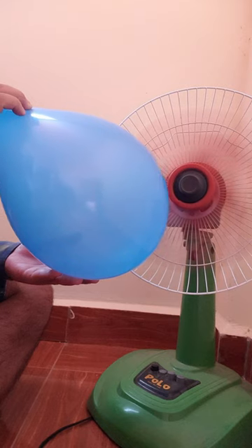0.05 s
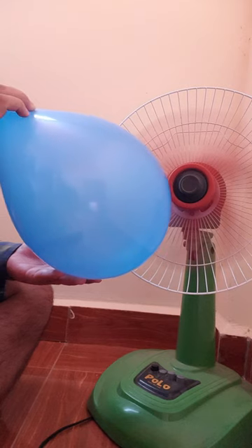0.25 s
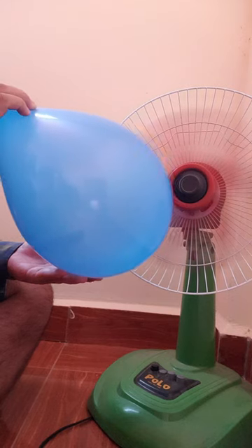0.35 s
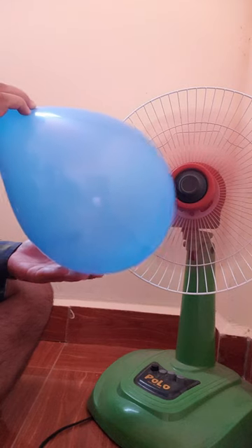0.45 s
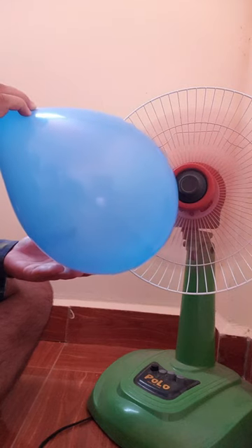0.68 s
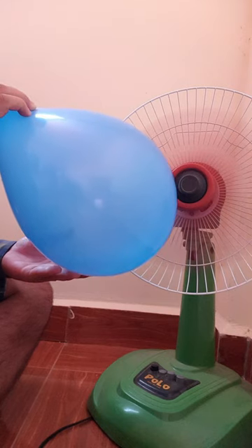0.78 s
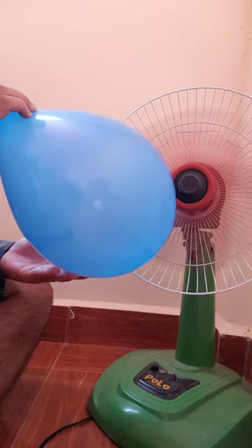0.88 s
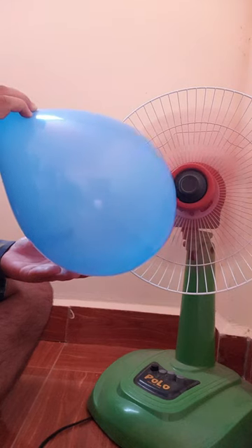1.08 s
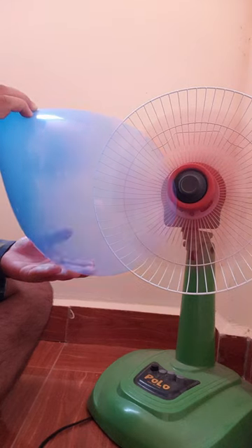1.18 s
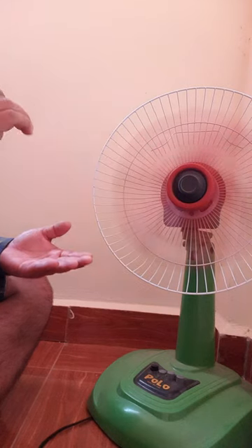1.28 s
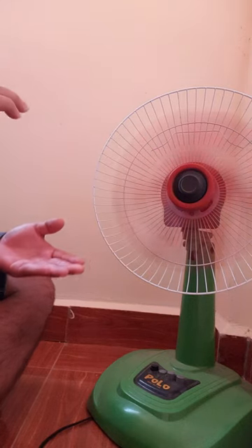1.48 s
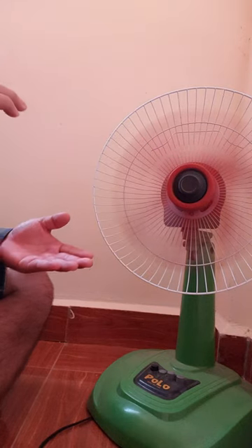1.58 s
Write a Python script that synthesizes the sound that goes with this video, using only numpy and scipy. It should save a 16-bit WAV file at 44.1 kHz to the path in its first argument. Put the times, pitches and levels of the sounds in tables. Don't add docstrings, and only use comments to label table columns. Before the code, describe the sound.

After a brief fan hum with light rattles, blades beat a balloon's skin in a rough, hissing flutter for about a second; it pops sharply, echoing in a hard small room, heard close up in stereo.

```python
import sys
import numpy as np
from scipy import signal
from scipy.fft import rfft, irfft
from scipy.io import wavfile
from scipy.ndimage import uniform_filter1d

SR = 44100
rng = np.random.default_rng(int(sys.argv[2]) if len(sys.argv) > 2 else 0)


def amp(db):
    return 10 ** (np.asarray(db, float) / 20)


def write(x):
    x = np.atleast_2d(x).T
    wavfile.write(sys.argv[1], SR, np.round(np.clip(x, -1, 1) * 32767).astype(np.int16))


N = 72765
T = np.arange(N) / SR

POP_S = 1.2616
LOOK_S = 0.006
STRETCH_S = (0.4, 0.82)

# t/s, strike level/dB
LONGEST_BLADE = [(0.2011, 6), (0.2563, -20), (0.3102, -22), (0.3688, -34), (0.4313, -25.5), (0.4993, -4),
                 (0.5767, -13), (0.6638, -39.5), (0.755, -24), (0.8364, -14), (0.916, -18), (0.9905, -34),
                 (1.0612, -19), (1.1341, -16), (1.2075, -8)]
BLADE_REACH = [0, -2.5, -5, -6, -8]
# t/s, drumming/dB, whole-skin swing over drumming/dB, scrape/dB,
# belly (two lowest skin modes) over its mean/dB
BALLOON_CONTACT = [(0.2, -33, -38, -36, -8), (0.21, -22.5, -23, -39.5, -11),
                   (0.245, -32.5, -26, -43.5, -1.5), (0.273, -18.5, -19, -33.5, 1),
                   (0.376, -18.5, -9, -25.5, 4), (0.408, -23, -42, -30, 9), (0.45, -17, 1, -26.5, -8.5),
                   (0.482, -37, 16, -29, -4), (0.502, -20.5, 3.5, -29, -15), (0.533, -24, -1.5, -25.5, 2.5),
                   (0.649, -28.5, 7.5, -28, 8), (0.681, -32.5, -12, -27.5, 16.5),
                   (0.722, -30.5, 6, -30, 8.5), (0.852, -31, -17, -34, 8.5), (0.938, -34, 0, -31.5, 3.5),
                   (1.096, -28, -4.5, -25.5, -1), (1.245, -28, 1.5, -24, -4), (1.256, -25.5, -27, -21.5, 6)]
# f/Hz, time to fall 60 dB/s
ROOM_DECAY = [(100, 0.93), (260, 0.42), (700, 0.42), (1840, 0.36), (4850, 0.37), (12800, 0.25)]


def evened(x):
    return x / np.sqrt(np.mean(x ** 2) + 1e-20)


def read(points, hz):
    f, value = np.transpose(points)
    return np.interp(np.log(hz + 1), np.log(f + 1), value)


def ramp(span):
    return np.clip((T - span[0]) / (span[1] - span[0]), 0, 1)


def resonate(x, hz, width):
    turn = np.exp(2j * np.pi * np.cumsum(hz * np.ones(N)) / SR)
    r = np.exp(-np.pi * abs(width) / SR)
    return 2 * (turn * signal.lfilter([1 - r], [1, -r], x / turn)).real


def twice(x, hz, width):
    return resonate(resonate(x, hz, width), hz, width)


def pair(colour, same):
    hz = np.fft.rfftfreq(N, 1 / SR)
    a, b = rfft(rng.standard_normal((2, N)))
    c = np.clip(read(same, hz), -1, 1)
    both = np.array([a, c * a + np.sqrt(1 - c ** 2) * b])
    return evened(irfft(both * amp(read(colour, hz)), N))


def steady(x, on):
    power = uniform_filter1d((x ** 2).mean(0), size=6001)
    touched = uniform_filter1d(on * 1., size=6001) + 1e-3
    return x / np.sqrt(power / touched + 1e-12)


def fan():
    # f/Hz, level/dB per Hz
    wash_colour = [(18, -40.5), (30, -15.5), (64, -11.5), (108, -9.5), (311, -18.5), (357, -12),
                   (465, -11.5), (490, -20), (2000, -39.5), (2600, -71), (4400, -120)]
    # f/Hz, level/dB per Hz
    air_colour = [(880, -19), (1500, -13.5), (1720, -16), (2740, -16), (3180, -19), (9750, -25.5),
                  (16000, -50)]
    # f/Hz, left-right likeness/-1 to 1
    air_likeness = [(60, 0.4), (250, 0.25), (700, 0.19), (1500, 0.05)]
    # t/s, level/dB, f/Hz
    rattles = [
        (.012, -36, 1000),
        (0.05, -50, 1110),
        (.062, -26, 600),
        (.135, -43, 1530),
        (0.148, -32, 1290),
        (0.181, -37, 1850),
    ]
    after = T > POP_S
    hum = evened(twice(rng.standard_normal(N), 65.3, 31))
    wash = amp(-37.5) * pair(wash_colour, air_likeness) + amp(-46.5) * hum
    lull = uniform_filter1d(np.where(after, amp(-21.5), 1.), size=301)
    air = amp(-55.5 - 5 * after) * pair(air_colour, air_likeness)
    tick = np.zeros(N)
    for start, db, hz in rattles:
        t = np.maximum(T - start, 0)
        tick = tick + amp(db) * t / 0.002 * np.exp(-t / 0.0016) * np.sin(2 * np.pi * hz * t)
    low_hum = after * amp(-43.5 - 28 * (T - POP_S)) * np.sin(2 * np.pi * 63.3 * T)
    return lull * wash + air + tick + low_hum


def room(x, t60_scale=1):
    taps = np.zeros((2, SR // 2))
    at = np.arange(100, SR // 2 - 20, 20) + rng.integers(0, 20, (2, (SR // 2 - 101) // 20))
    np.put_along_axis(taps, at, rng.choice([-1., 1.], at.shape), 1)
    hz, t, z = signal.stft(taps, SR, nperseg=256)
    t60 = t60_scale * read(ROOM_DECAY, hz)[:, None]
    tail = signal.istft(z * amp(-60 * t / t60), SR, nperseg=256)[1]
    return signal.fftconvolve(x, tail / np.linalg.norm(tail[0]), axes=1)[:, :N]


def blades():
    s = np.transpose(LONGEST_BLADE)[0]
    first = s[0]
    s = np.r_[2 * s[0] - s[1], s, 2 * s[-1] - s[-2], 3 * s[-1] - 2 * s[-2]]
    turns = np.interp(T, s, np.arange(len(s)))
    count = len(BLADE_REACH) * uniform_filter1d(turns, size=2001)
    return count, (T > first - .001) & (T < POP_S - LOOK_S)


def strikes(count, touching, spread_db, jitter, reach):
    luck = rng.standard_normal((200, 2))
    k = np.flatnonzero(np.diff(np.floor(count)) * touching[1:])
    n = np.floor(count[k + 1]).astype(int)
    blade = n % len(BLADE_REACH)
    at = k + (jitter * SR / 70 * abs(luck[n, 0])).astype(int) * (blade > 0)
    out = np.zeros(N)
    out[at] = amp(reach * np.array(BLADE_REACH)[blade] + spread_db * luck[n, 1])
    return out


def skin_swing(count, gate):
    s, drum_db, swing_db = np.transpose(BALLOON_CONTACT)[:3]
    skew = 0.11 + 0.34 * np.sin(2 * np.pi * 12 * T)
    phase = 2 * np.pi * count + 2.2 + skew * np.array([[-1], [1]])
    return np.sqrt(2) * np.cos(phase) * gate * amp(np.interp(T, s, drum_db + swing_db))


def skin_drum(count, on, gate):
    # f/Hz, width/Hz, level while slack/dB, level once taut/dB
    skin_modes = [(107.3, 23, -6.5, -4.5), (182, 26.4, -1.5, -41), (286, 41.5, -1.5, -4),
                  (336.9, 43, -1.5, -20), (500.6, 48, -14, -7), (630, 27, -15.5, -17),
                  (747, 25.4, -21.5, -14)]
    # f/Hz, width/Hz, level/dB
    long_rings = [(343, 18, 1), (750, 16, -24)]
    s, drum_db, _, _, belly_db = np.transpose(BALLOON_CONTACT)
    slap = evened(strikes(count, on, spread_db=2.6, jitter=.024, reach=0.25))
    slap = slap + .28 * rng.standard_normal((2, N)) * on
    slap = signal.sosfilt(signal.butter(2, 900, fs=SR, output="sos"), slap)
    taut = ramp((0.8874, 0.8883))
    belly = np.interp(T, s, belly_db)
    drum = np.zeros((2, N))
    for k, (f, width, slack_db, taut_db) in enumerate(skin_modes):
        db = slack_db + (taut_db - slack_db) * taut + (k < 2) * belly
        drum = drum + (-1) ** k * amp(db) * resonate(slap, f, width)
    swell = np.sqrt(2) * abs(np.sin(np.pi * (count / len(BLADE_REACH) - 0.023)))
    late_level = drum[:, taut == 1].std()
    for f, width, db in long_rings:
        ring = steady(resonate(slap, f, width), on) * gate
        drum = drum + taut * swell * late_level * amp(db) * ring
    return steady(drum, on) * amp(np.interp(T, s, drum_db))


def scrape_bursts(count, on):
    s, scrape_db = np.transpose(BALLOON_CONTACT)[[0, 3]]
    clicks = strikes(count, on, spread_db=1.3, jitter=0.0302, reach=0.75)
    at, db = np.transpose(LONGEST_BLADE)
    over_db = db - np.interp(at, s, scrape_db)
    accent = np.ones(N)
    for start, d in zip(at, over_db - over_db.mean()):
        accent = accent + (amp(.3 * d) - 1) * (abs(T - start) < .005)
    u = T[:3000] / 0.0061
    bursts = signal.oaconvolve(clicks * accent, np.minimum(u / .6, 1) * np.exp(-u))[:N]
    return bursts * amp(3 * evened(uniform_filter1d(rng.standard_normal(N), size=40)))


def guard_rings(grit, count):
    # f/Hz, width/Hz, level/dB
    guard_modes = [(2830, 150, -1), (3200, 190, 3), (4060, 200, 0), (4800, 420, 0), (7000, 800, -2),
                   (10300, 1200, -3), (12600, 1200, -2)]
    luck = rng.standard_normal((200, 2 * len(guard_modes)))[count.astype(int)].T
    rings = np.zeros((2, N))
    for k, (f, width, db) in enumerate(guard_modes):
        rings = rings + twice(grit * amp(db + 3.5 * luck[k]), f * (1 + .022 * luck[-1 - k]), width)
    return evened(rings)


def skin_scrape(count, on, gate):
    # f/Hz, level/dB per Hz
    light_colour = [(290, -33), (500, 1), (678, -7.5), (1950, -12), (2360, -9), (3650, -17), (9360, -23.5),
                    (15100, -22.5), (16000, -54.5)]
    # f/Hz, level/dB per Hz
    stretched_colour = [(290, -28), (500, -8.5), (750, -7.5), (819, -10), (2130, -9), (3150, -6),
                        (3590, -12.5), (7210, -5.5), (16000, -10.5)]
    # f/Hz, left-right likeness/-1 to 1
    hiss_likeness = [(60, 0.31), (180, 0.23), (550, 0.75), (1650, 0.12), (4970, 0.25), (15000, 0.18)]
    # f/Hz, width/Hz, depth/0-1
    guard_gaps = [(2600, 160, .5), (3620, 160, .45), (4360, 150, .5)]
    s, scrape_db = np.transpose(BALLOON_CONTACT)[[0, 3]]
    bursts = scrape_bursts(count, on)
    share = ramp(STRETCH_S)
    hiss = np.sqrt(1 - share) * amp(-3.5) * pair(light_colour, hiss_likeness)
    hiss = hiss + np.sqrt(share) * pair(stretched_colour, hiss_likeness)
    hiss = hiss * (bursts + amp(-18 + 7 * (1 - share)) * gate)
    grit = rng.standard_normal((2, N)) * bursts
    for k, (f, width, depth) in enumerate(guard_gaps):
        drift = 1 + .8 * np.sin(2 * np.pi * 2.3 * T + 2 * k)
        hiss = hiss - depth * share * drift * resonate(hiss, f, width)
    hiss = hiss + amp(-1) * share * guard_rings(grit, count) * hiss.std()
    slack_ring = evened(resonate(grit, 2354, 87))
    hiss = hiss + amp(-15.5) * (1 - share) * slack_ring * hiss.std()
    return hiss * amp(np.interp(T, s, scrape_db) + 8.0)


def pop():
    # f/Hz, level/dB per Hz
    pop_colour = [(35, -44), (60, -8.5), (319, -23), (385, -6), (589, -4), (988, -13), (12600, -16.5),
                  (15500, -17), (16700, -46)]
    # f/Hz, left-right likeness/-1 to 1
    pop_likeness = [(60, 1), (240, 1), (600, 0.53), (1100, -0.61), (3770, 0.28), (15000, -0.47)]
    # f/Hz, level/dB, time to fall 60 dB/s
    room_modes = [(407.4, -19, 0.42), (510, -35, 0.69), (642, -23, 0.32), (674, -33, 0.27),
                  (755, -20.5, 0.23), (846, -29, 0.16), (169.3, -25, 0.42), (57.2, -26.5, 0.26)]
    # f/Hz, level/dB, time to fall 60 dB/s
    torn_rings = [(380, -12, 0.041), (600, -19, .09), (1910, -14, .018), (3000, -21, .015),
                  (3650, -21, 0.009), (5090, -25, .015)]
    t = np.maximum(T - POP_S, 0)
    echo = amp(-13) * np.exp(-((t - 0.022) / 0.0059) ** 2)
    tear = pair(pop_colour, pop_likeness) * (T >= POP_S) * np.minimum(t / .0008, 1)
    tear = tear * (np.exp(-t / .0035) + echo) * amp(-3.5)
    u = np.maximum(t - .0015, 0) / 0.00033
    blast = amp(-2.5) * u * (2 - u) * np.exp(-u)

    hz, s, z = signal.stft(pair(pop_colour, pop_likeness), SR, nperseg=256)
    late = np.maximum(s - POP_S - 0.023, 0)
    decay = amp(-60 * late / read(ROOM_DECAY, hz)[:, None])
    tail = signal.istft(z * decay, SR, nperseg=256)[1][:, :N]
    tail = tail * np.minimum(t / 0.001, 1) * amp(-12)

    phases = rng.uniform(0, 2.5, (len(room_modes), 2, 1))
    modes = np.zeros((2, N))
    for (f, db, t60), phase in zip(room_modes, phases):
        modes = modes + amp(db - 60 * t / t60) * np.sin(2 * np.pi * f * t + phase)
    age = np.maximum(t - 0.001854, 0)
    crack = sum(amp(db - 60 * age / t60) * np.sin(2 * np.pi * f * age) for f, db, t60 in torn_rings)
    return tear + blast + crack + tail + modes * np.minimum(t / 0.0012, 1)


def scene():
    count, on = blades()
    gate = uniform_filter1d(on * 1., size=101)
    drum = skin_drum(count, on, gate)
    hiss = skin_scrape(count, on, gate)
    rub = drum + hiss
    wet = room(amp(-1) * drum + hiss, t60_scale=0.98)
    wet = wet * uniform_filter1d(1. * (T < POP_S - LOOK_S), size=201)
    side = signal.sosfilt(signal.butter(1, 250, "high", fs=SR, output="sos"), wet - wet.mean(0))
    rub = np.array([np.roll(rub[0], -2), rub[1]])
    before = rub + skin_swing(count, gate) + amp(-8) * (wet.mean(0) + side) + fan()
    clamp = ramp((POP_S - 1.4 * LOOK_S, POP_S - .5 * LOOK_S)) * (T < POP_S + LOOK_S)
    return before * amp(-16 * clamp) + pop()


def low_pass(x):
    return signal.sosfilt(signal.butter(12, 16820, fs=SR, output="sos"), x)


def record(dry):
    dry = dry - .6 * resonate(dry, 8800, 1100)
    ceiling, fade_s = 1.1, 1.58
    treble_cut = signal.cheby2(16, 40, 16300, fs=SR, output="sos")
    held = signal.sosfiltfilt(treble_cut, ceiling * np.tanh(dry / ceiling))
    fade = amp(-4 * (np.maximum(T - fade_s, 0) / (T[-1] - fade_s)) ** 2)
    return low_pass(held * fade)


dry = scene()
out = record(dry)
write(out)
```